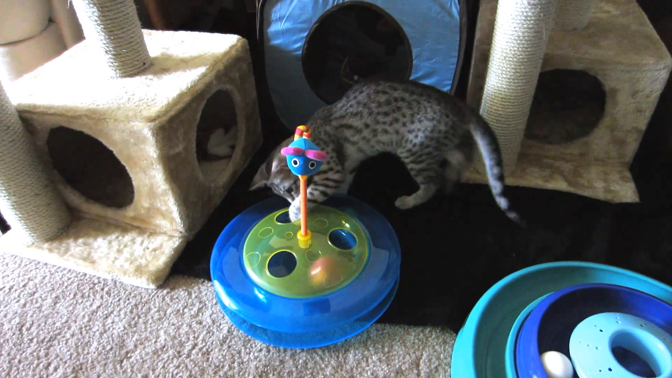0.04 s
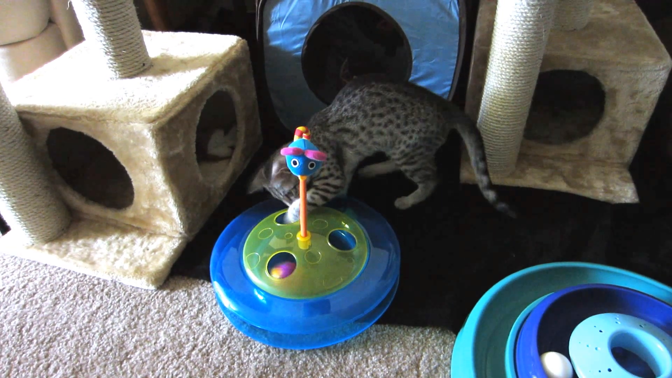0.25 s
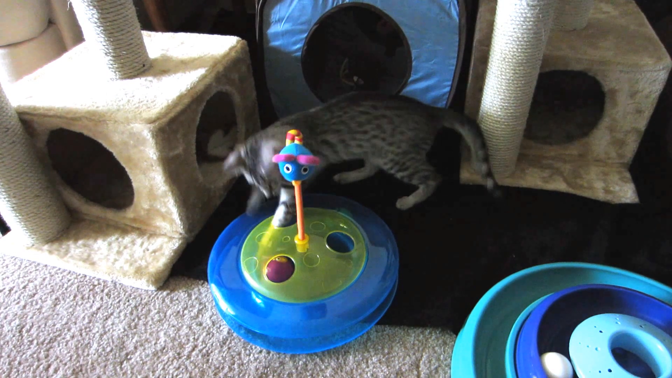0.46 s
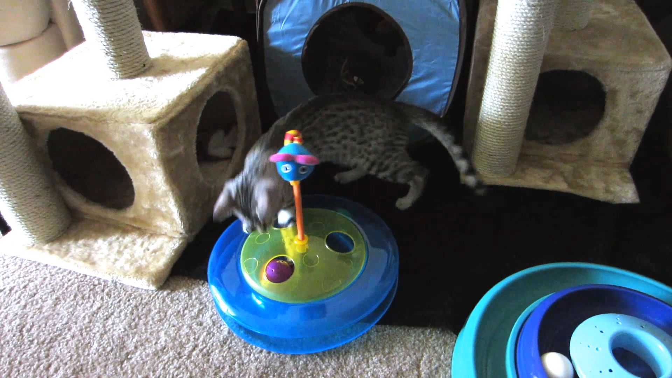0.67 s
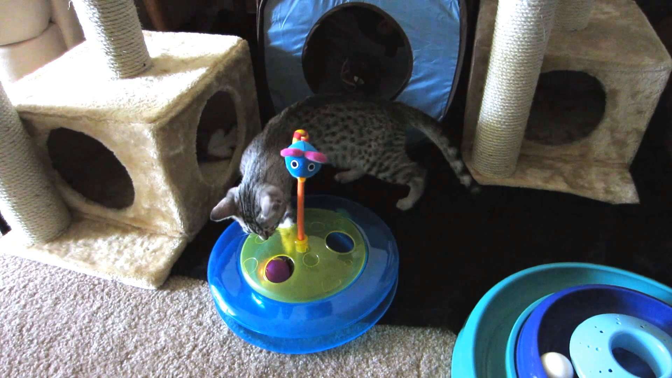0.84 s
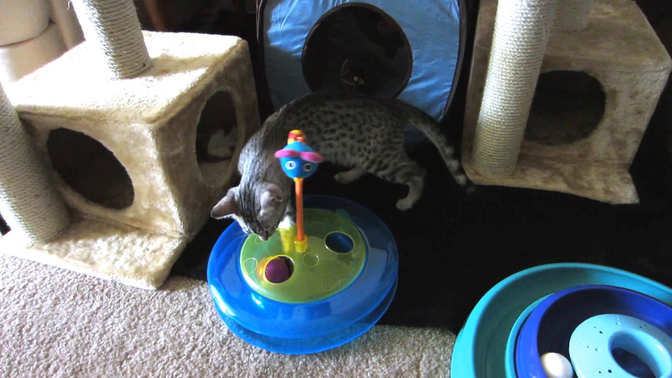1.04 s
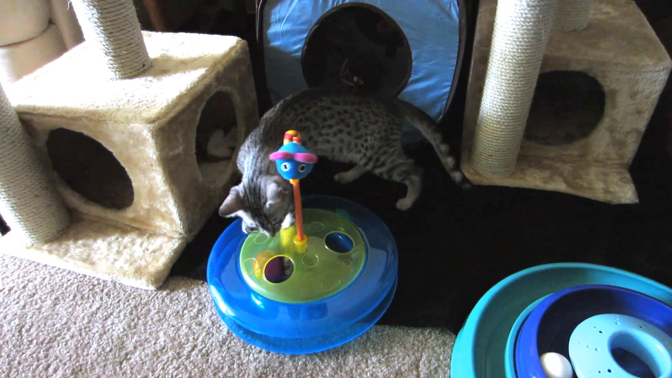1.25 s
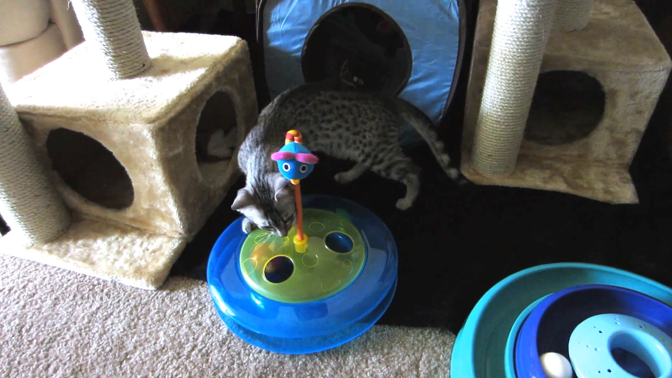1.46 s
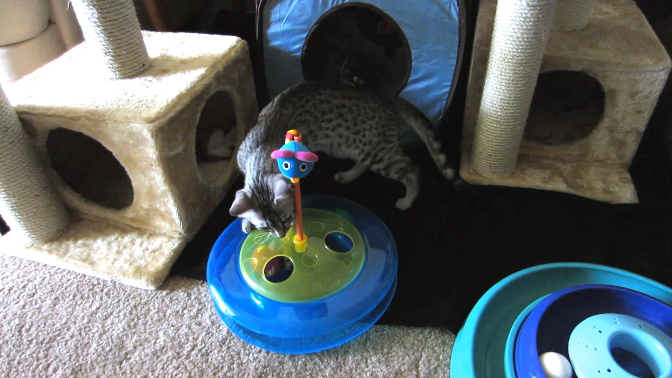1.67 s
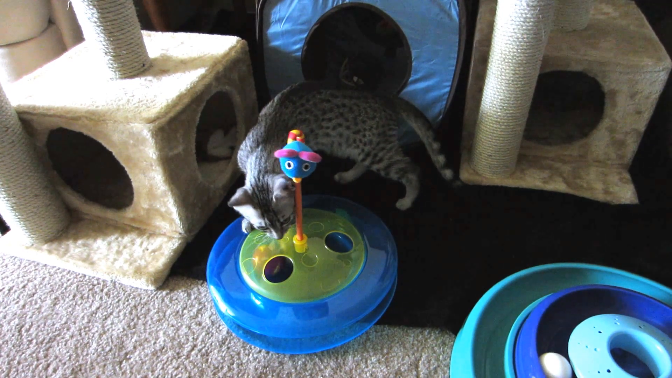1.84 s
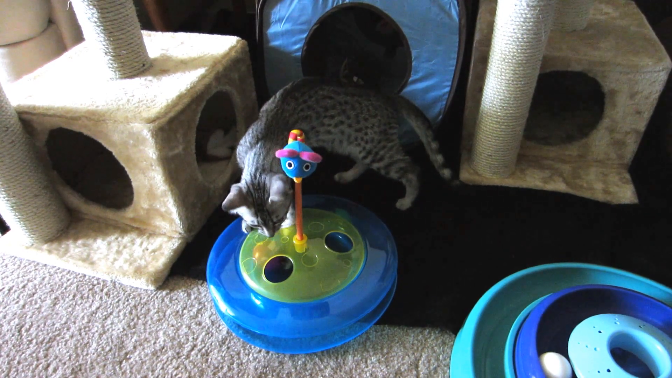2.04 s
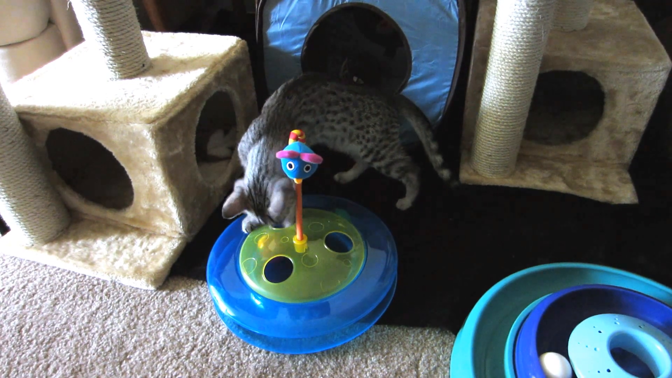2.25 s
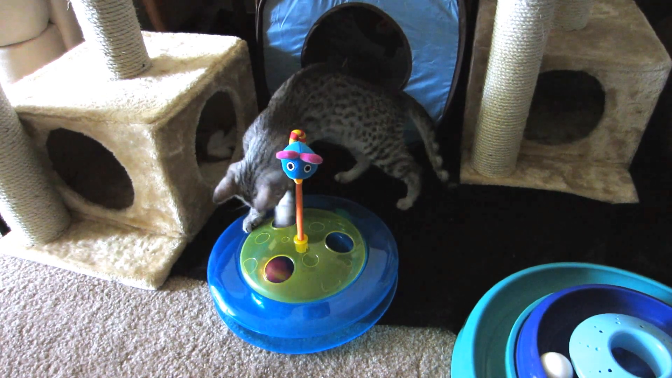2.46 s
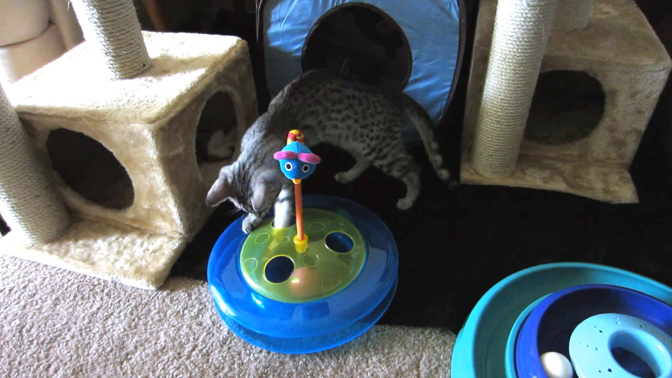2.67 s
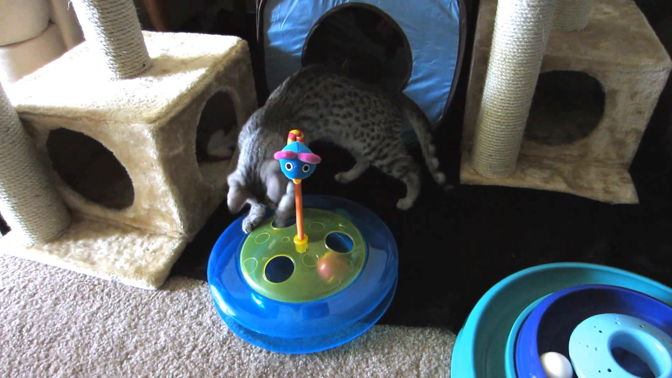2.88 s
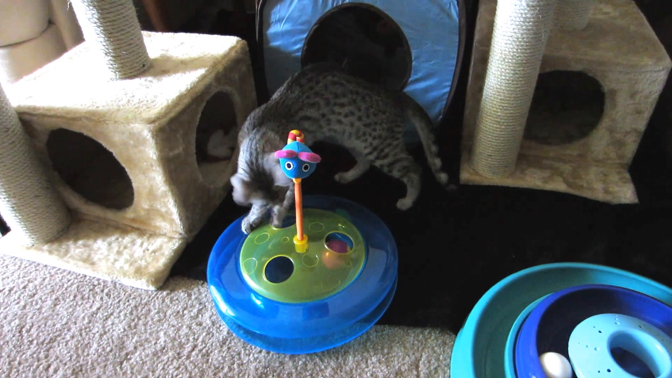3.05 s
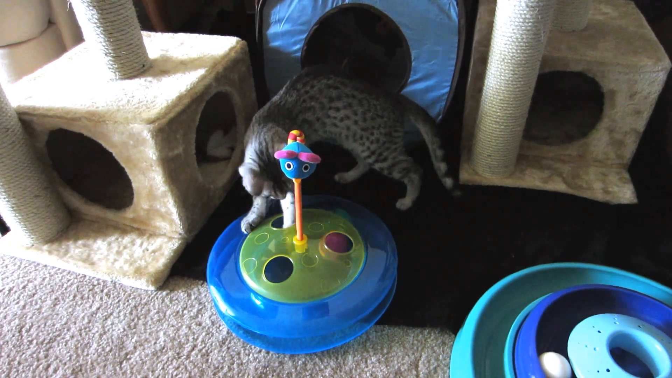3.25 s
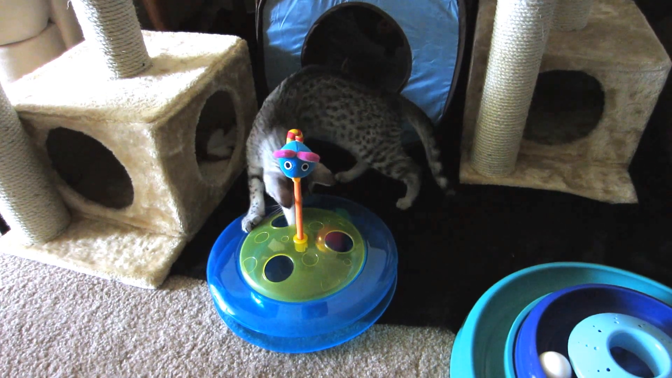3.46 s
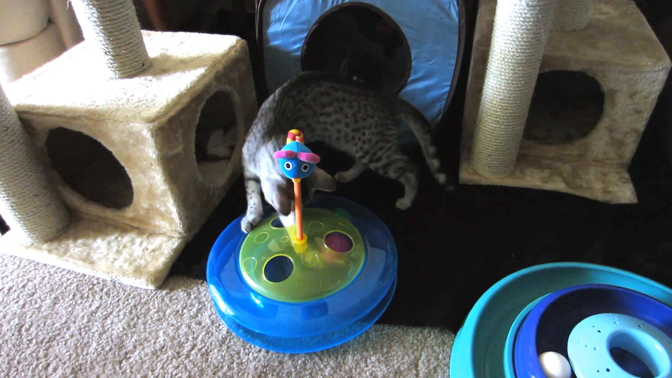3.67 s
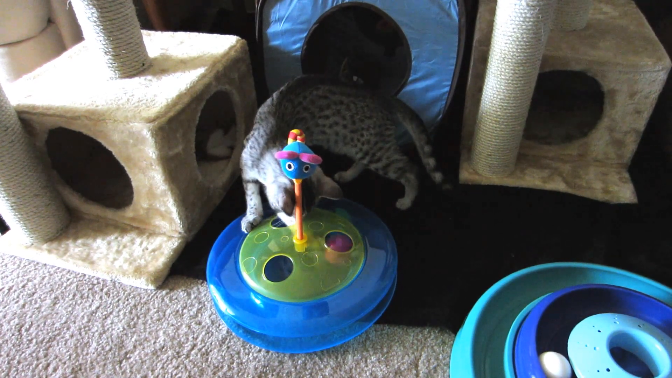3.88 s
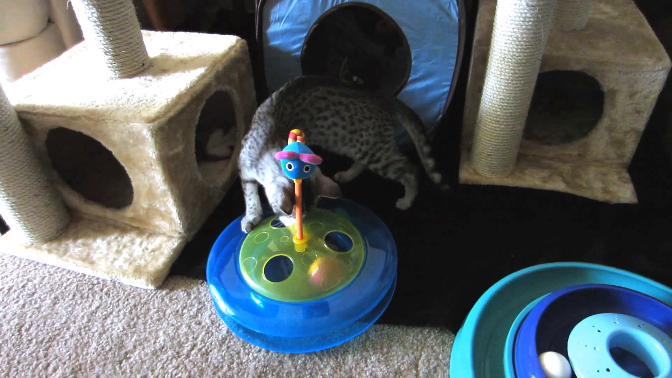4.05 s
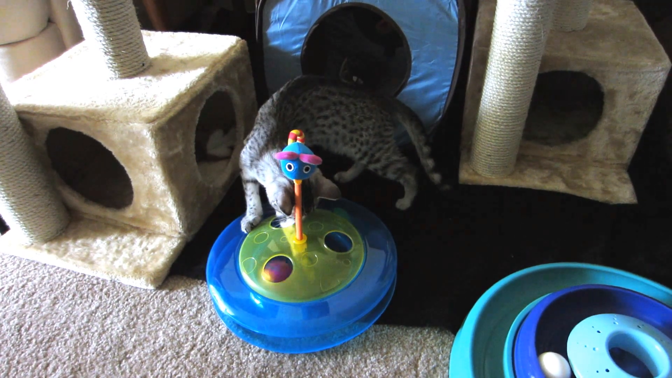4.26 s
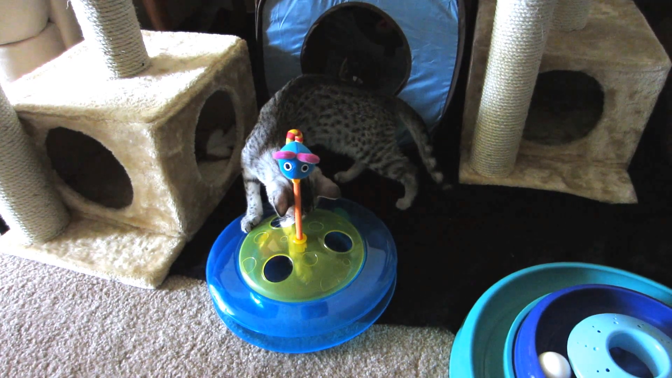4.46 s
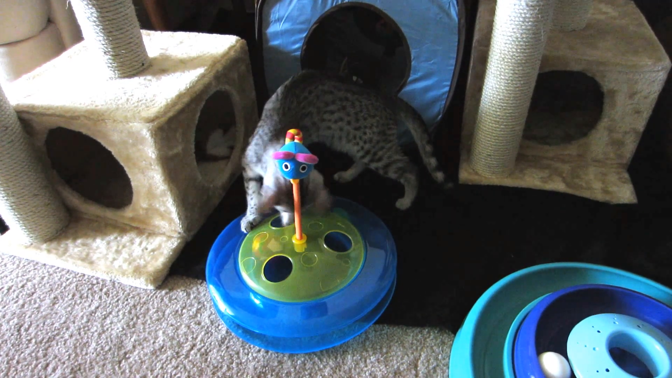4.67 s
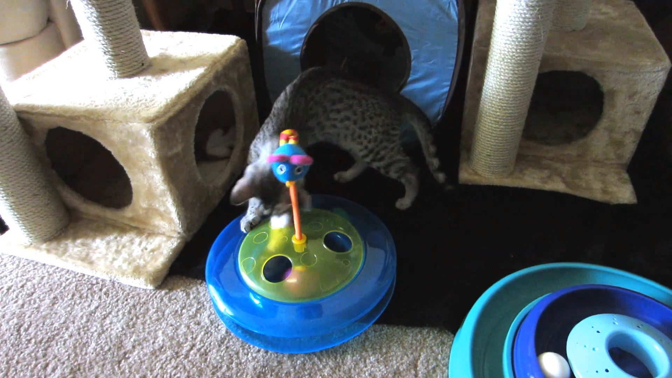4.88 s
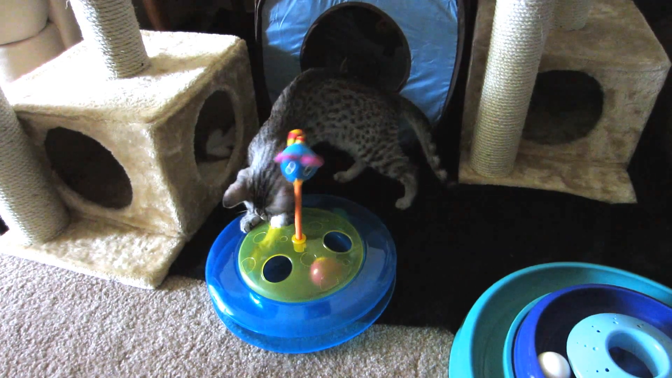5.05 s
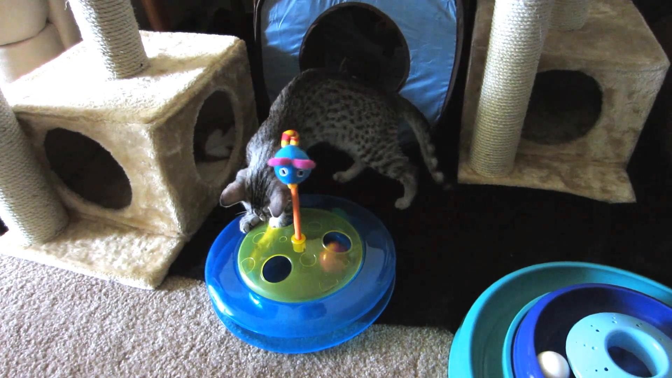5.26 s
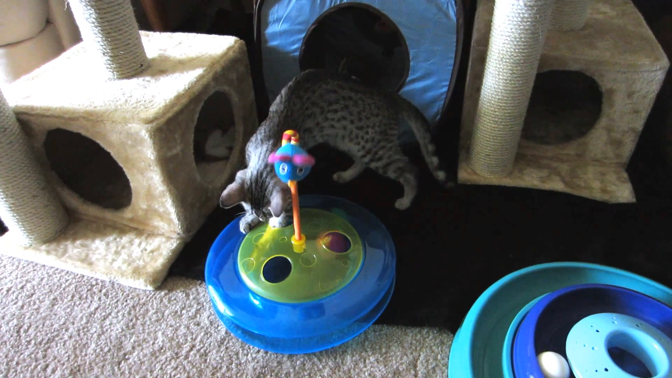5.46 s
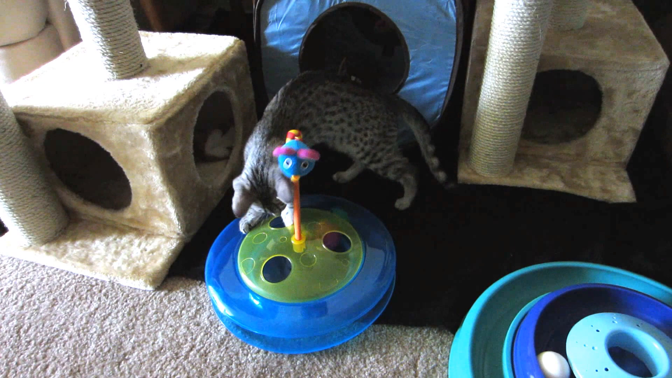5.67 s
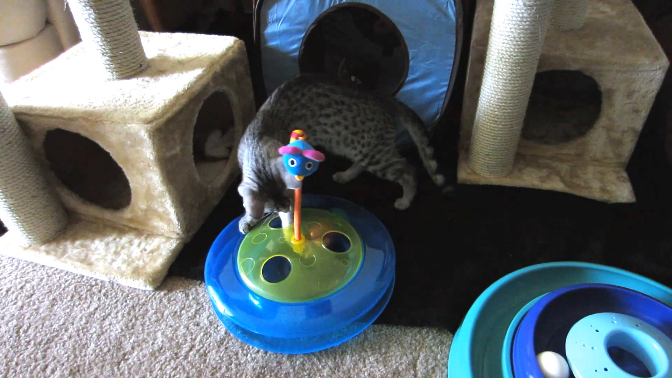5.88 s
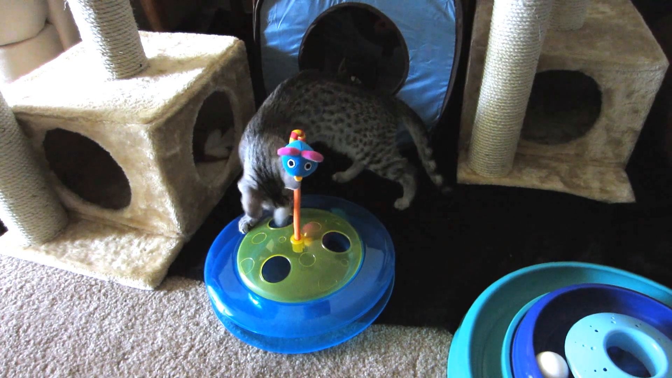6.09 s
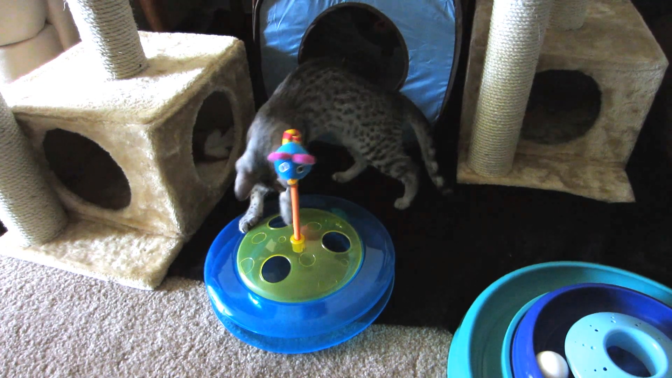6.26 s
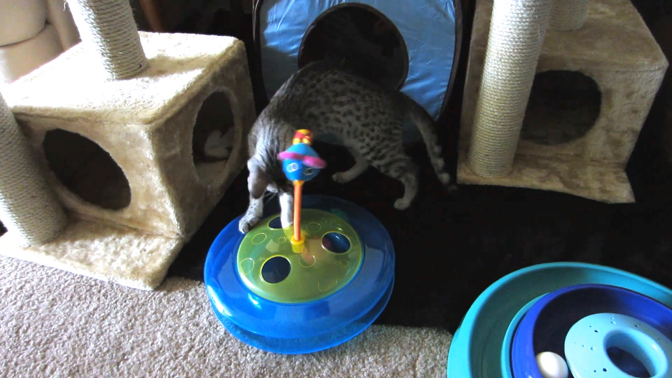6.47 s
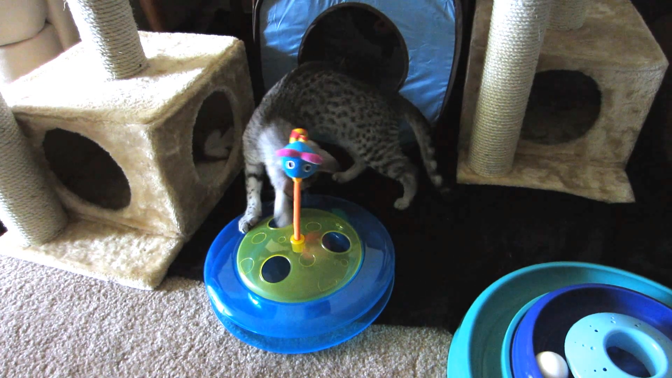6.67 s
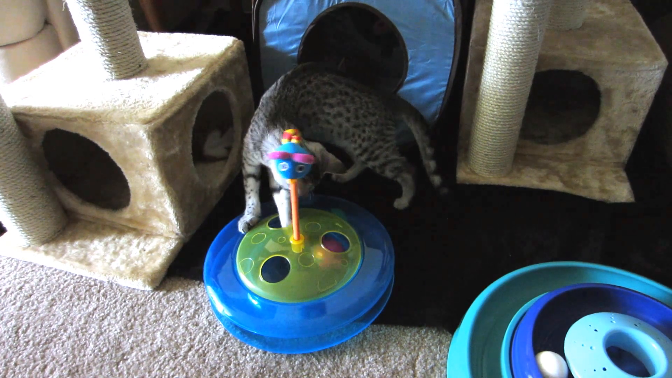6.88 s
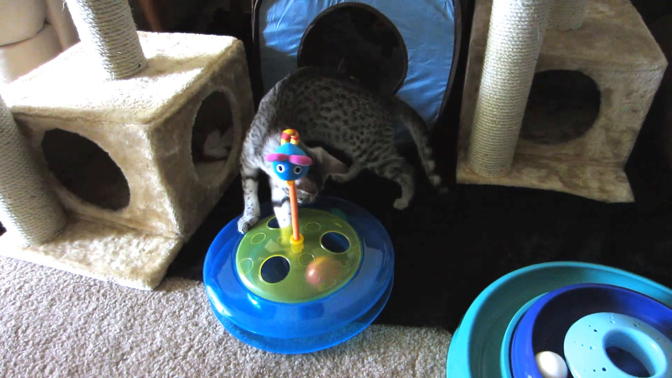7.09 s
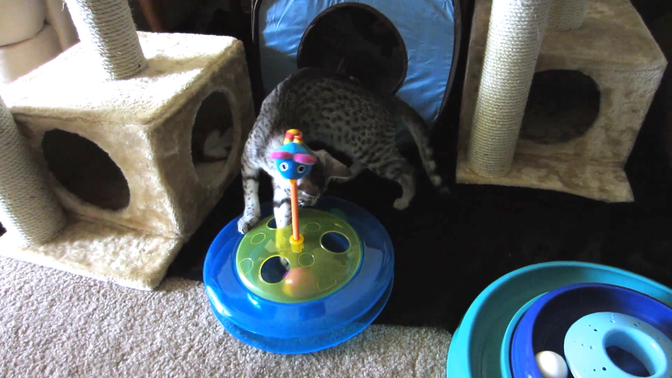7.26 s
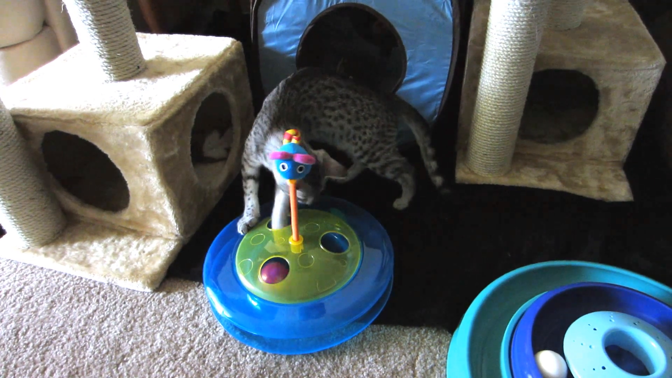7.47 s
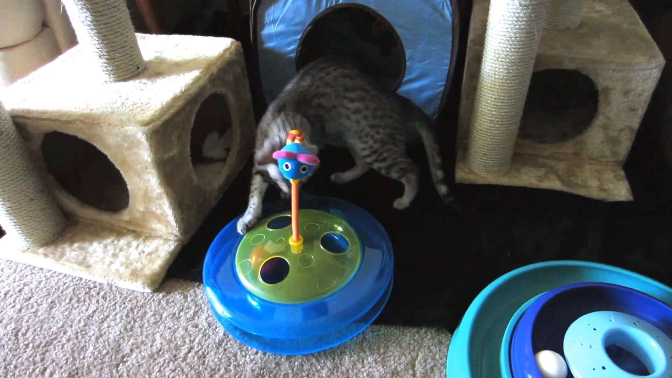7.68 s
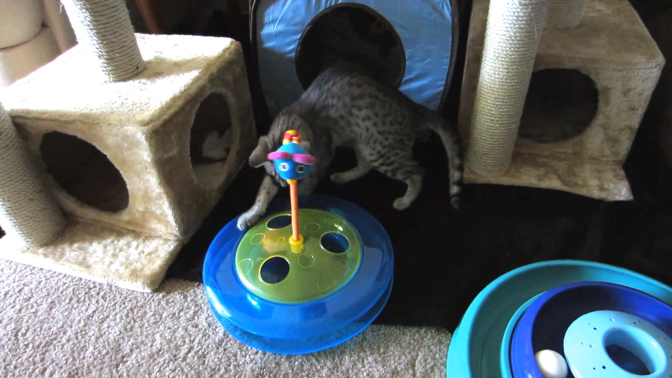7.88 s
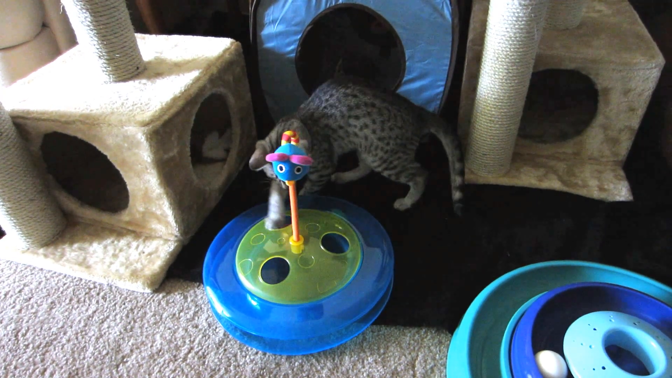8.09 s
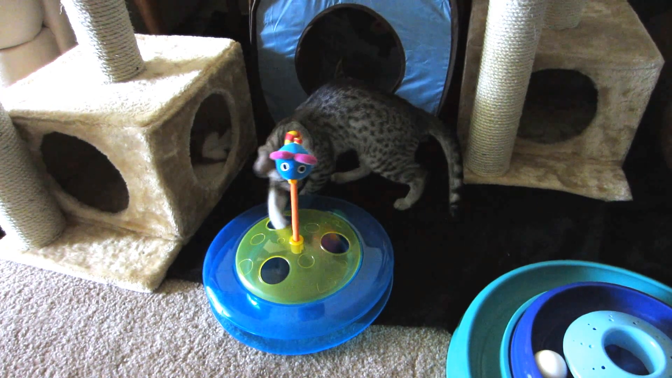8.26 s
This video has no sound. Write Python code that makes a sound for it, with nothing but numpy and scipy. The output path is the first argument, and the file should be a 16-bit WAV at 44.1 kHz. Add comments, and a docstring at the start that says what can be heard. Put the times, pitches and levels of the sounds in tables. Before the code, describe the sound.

Close to the microphone, a cat bats balls inside a hollow plastic track toy. A quick cluster of clattering knocks and rolling opens it, then isolated hard clacks with pauses, another rattling flurry, a lull, a dense busy stretch in the middle, and sparser bursts up to the end. Small dry carpeted room, low air noise and a faint thin whine.

```python
"""Quiet carpeted room: a cat bats the balls of a round plastic track toy close to the microphone.
Knocks and rolling balls excite decaying modes of hollow base, domed lid, thin track walls and ball.
Shaped noise adds cracks to the blows and thin bright ticks, likely claws on plastic.
Sparse reflections surround the toy; filtered noise and wandering sines make room air and a faint whine.
Widened stereo: the left channel is a phase-shifted, level-shifted version of the right."""
import sys
import numpy as np
from scipy import signal
from scipy.fft import rfft, irfft, next_fast_len
from scipy.io import wavfile
from scipy.ndimage import uniform_filter1d

SR = 44100
rng = np.random.default_rng(int(sys.argv[2]) if len(sys.argv) > 2 else 0)


def bounce(signal):
    """Save signal as a 16-bit WAV file at the path given by the first command-line argument."""
    frames = np.transpose(np.atleast_2d(signal))
    limited = np.clip(frames, -1, 1)
    pcm = np.round(limited * 32767).astype(np.int16)
    wavfile.write(sys.argv[1], SR, pcm)


N = 367353

# room air noise, spectral shape in the right channel: (frequency [Hz], relative density [dB])
AIR_SPECTRUM = [(20, -24), (40, -15), (90, 1), (200, 2), (500, -1), (1000, -3.5), (1400, -6.5), (1680, -13),
                (1950, -10.5), (2300, -18), (3000, -25), (3700, -25.5), (4200, -29.5), (6500, -33),
                (9500, -41.5), (16000, -45)]
# faint whine: (frequency [Hz], left level [dB rms], right level [dB rms], left lead [rad], wander [Hz rms])
WHINE_TONES = [(1895, -54.5, -61, -2.5, .4), (6132, -81, -82, -1.7, 1.)]
# left channel re right, room air: (frequency [Hz], level [dB], phase lead [rad], likeness [0-1])
AIR_STEREO = [(60, 2, -1.15, .7), (200, -.8, -1.35, .77), (360, -2.4, -1.9, .8), (600, -.8, -2.4, .83),
              (1250, 2.3, -2.86, .86), (2000, 3.5, -2.8, .75), (4000, 2.3, -2.5, .5), (5500, .2, -2.5, .12),
              (9000, -1, -2.5, .05)]
# left channel re right, toy; likeness for reflections: (frequency [Hz], level [dB], lead [rad], likeness [0-1])
TOY_STEREO = [(100, 0, -1., .95), (200, -1.5, -1.1, .95), (420, -2.2, -1.57, .9), (800, -3.4, -2.2, .85),
              (1500, -3.4, -3.1, .85), (2250, -6.8, -3.45, .8), (4000, -8, -3.95, .6),
              (6000, -11, -4.35, .35), (11000, -14, -4.8, .2), (16000, -7, -5.2, .1)]
# reverberation: (frequency [Hz], t60 [s])
ROOM_DECAY = [(200, 0.47), (1000, 0.22), (4000, 0.35), (12000, 0.46)]
# balls pushed into rolling: (time of full speed [s], rumble level [dB])
ROLLS = [(0.02, -35.5), (.53, -35), (1.5, -56.5), (1.92, -43.5), (2.57, -34.5), (4.11, -42.5), (4.4, -37),
         (4.85, -35), (5.4, -50.5), (6.56, -58), (7.12, -43.5), (7.45, -49), (7.79, -50.5), (8.31, -32)]
# knocks of ball or paw: (time [s], lid force [dB], base re lid [dB], crack re lid [dB])
KNOCKS = [(.0004, -24, -4.5, -24), (.055, -23, -18, -31), (.0856, -22.5, -4, -27), (.1074, -16.5, -20, -29),
          (.118, -38.5, 14, -9), (.1465, -25, -2, -32.5), (.207, -35.5, 1.5, -25), (.3491, -20.5, -6, -26),
          (.3631, -21, -11, -32.5), (.4209, -35, -2, -9.5), (.4552, -19.5, -14, -25.5),
          (.5024, -18, 2.5, -15), (.561, -20.5, -5, -46), (.6266, -7, -8, -18.5), (.6394, -10, -19.5, -22),
          (.688, -37, -22, -35), (1.157, -9.5, -2.5, -18), (1.1828, -9, -22, -21),
          (1.5607, -11.5, -2.5, -20), (1.5872, -19, -6.5, -20), (1.6457, -4.5, -35, -23.5),
          (1.8802, -21, -3, -23), (2.0637, -25.5, -15, -55), (2.1906, -29.5, -2, -23),
          (2.392, -23, -8.5, -53), (2.4518, -11.5, -19, -27.5), (2.5067, -13, 0, -18.5),
          (2.532, -17, -0.5, -19), (2.5933, -22.5, -5, -32), (2.6113, -25.5, 2.5, -20),
          (2.6476, -42, -14, -23), (2.6632, -21.5, -4, -26.5), (2.6916, -30, -7, -24),
          (2.7399, -31, 2, -25), (2.7668, -26, -1.5, -31), (2.8046, -27.5, -0.5, -25),
          (2.843, -26.5, -4, -29), (2.9479, -34, 6.5, -26), (3.0517, -32.5, -1, -25),
          (3.1582, -30, -15, -28.5), (3.5025, -33.5, 0.5, -14), (3.6828, -31, -3.5, -25.5),
          (3.7556, -28, -11, -38), (3.7739, -32, 0.5, -29), (3.9203, -9, -10, -19),
          (4.0081, -13, -1.5, -24), (4.1375, -15, -12, -31), (4.1554, -32, 12.5, -9.5),
          (4.1785, -18.5, -22, -26.5), (4.1957, -35, 11, -15), (4.2842, -28, -2, -29),
          (4.3021, -18, -8, -29), (4.3277, -16.5, -3, -19.5), (4.3544, -19.5, -2, -23),
          (4.3714, -23.5, -3, -17.5), (4.451, -33, -27, -38), (4.4826, -28.5, -0.5, -30),
          (4.552, -23.5, -5, -36), (4.5615, -21.5, -1, -30.5), (4.6355, -28, -6, -27),
          (4.6513, -20.5, 1, -24), (4.674, -11, -21, -22.5), (4.7741, -23, -18, -27),
          (4.8407, -14, -1.5, -16.5), (4.8813, -19, -11, -24.5), (4.8935, -22, -1.5, -21),
          (4.9493, -12, -27, -25.5), (4.9726, -20.5, 2, -24), (5.0067, -21.5, -7, -34),
          (5.0846, -29, -7.5, -29), (5.1322, -27.5, -3.5, -31), (5.2059, -32.5, 3.5, -23),
          (5.5087, -33, -2.5, -25), (5.6167, -18.5, -5, -40), (5.674, -23, -15, -29),
          (5.815, -18, 2.5, -18), (5.8273, -26.5, -23, -14.5), (6.1946, -46.5, -10, -9),
          (6.3999, -15, -12.5, -58), (6.4294, -20, -5.5, -55), (6.6296, -18.5, -8, -59),
          (6.7547, -34, -7, -18), (6.9793, -19.5, -7.5, -23), (7.0138, -14.5, -1, -17.5),
          (7.0491, -29, -1, -30), (7.1051, -24.5, -2.5, -31), (7.1164, -28.5, 2, -19),
          (7.2219, -17, -17, -32.5), (7.2328, -47, 19, -24), (7.2609, -30, 0, -33), (7.303, -33, 1, -29),
          (7.3757, -28.5, -3, -24), (7.615, -36.5, 4.5, -24), (7.711, -30.5, 0.5, -24),
          (7.7882, -20, -22, -29), (7.8025, -23.5, 0, -20), (7.8392, -29, -3, -30), (7.8563, -33, 0, -27),
          (7.8916, -25, -3.5, -31), (8.1776, -39.5, -9, -15), (8.2257, -11, -14, -20),
          (8.2448, -24.5, -6.5, -10.5), (8.287, -19.5, -16, -41)]
# thin bright ticks, likely claws on plastic: (time [s], level before colouring [dB], t60 [s])
CLAW_TICKS = [(0.4094, -65, 0.098), (3.5047, -44.5, 0.049), (3.5594, -57, 0.086), (3.6384, -50, 0.054),
              (4.776, -49.5, 0.12), (4.941, -41.5, 0.047), (6.1953, -63, 0.064), (6.7545, -61, 0.08),
              (6.8314, -42.5, 0.057), (7.891, -58, 0.063), (8.1748, -55, 0.044)]
# noise colour of a crack: (frequency [Hz], gain [dB])
CRACK_COLOUR = [(1500, 0.5), (3000, 20), (6000, 2), (9000, -5.5), (15000, -16)]
# noise colour of a tick: (frequency [Hz], gain [dB])
TICK_COLOUR = [(2000, -11), (4500, 7.5), (6500, 11), (9000, 4.5), (15000, -8)]
# modes of the hollow base: (frequency [Hz], relative level [dB], t60 [s])
BASE_MODES = [(174.3, -12.5, 0.12), (197, -4.5, 0.12), (248.5, -3, 0.053), (303, 0.5, 0.076),
              (346.7, 0.5, 0.045), (422.3, 2.5, 0.062), (488, 1, 0.076)]
# modes of the domed lid: (frequency [Hz], relative level [dB], t60 [s])
LID_MODES = [(508, -0.5, 0.015), (672.5, 0, 0.03), (820, -9, 0.071), (936, 5, 0.025), (1038, 3.5, 0.03),
             (1187, 3.5, 0.014)]
# modes of the thin track walls: (frequency [Hz], relative level [dB], t60 [s])
WALL_MODES = [(1426, 3.5, 0.018), (1498, 7.5, 0.022), (1562, 6.5, 0.0087), (1882, 2, 0.009)]
# modes of the ball shell: (frequency [Hz], relative level [dB], t60 [s])
BALL_MODES = [(2200, 10, 0.02), (2457, -4.5, 0.019), (2877, -10, 0.023), (2956, -11.5, 0.036),
              (3180, -10, 0.015), (3536, -13.5, 0.036), (3825, -13, 0.022), (4280, -12, 0.02),
              (4910, -14, 0.022), (6190, -17.5, 0.018)]
# microphone colour: (frequency [Hz], gain [dB])
MIC_RESPONSE = [(8000, -1.98), (10500, -5.5), (11800, -17.5), (13000, -10.5), (15000, -4)]

AIR_DB_RMS, BAND_EDGE_HZ = -40, 15850
PATTERN_TURN_S = .23  # three reflection patterns rotate slowly, each leading in turn
SPEEDUP_DB_PER_S, SLOWDOWN_DB_PER_S, ROCKING_DB = 123, 57, -57  # at rest the balls still rock faintly
GRIT_PER_S = 500
TAPS_PER_S, TAP_RE_RUMBLE_DB, TAP_SPREAD_DB, TAP_CRACK_RE_LID_DB = 12, 4, 6, -36
WALLS_RE_LID_DB, WALLS_DB_PER_CRACK_DB, WALLS_DB_PER_BASE_DB = 1.5, 0.2, 0.15
REFLECTIONS_DB = -7.5
GAIN_THRESHOLD_DB, GAIN_CUT_DB_PER_DB, GAIN_RECOVERY_DB_PER_S = -20, 0.32, 22.0  # recovery of the held level


def gain_of(db):
    """Decibels to amplitude."""
    return 10 ** (np.asarray(db) / 20)


def evened(x):
    """Scale to rms 1."""
    return x / np.sqrt(np.mean(x ** 2) + 1e-20)


def columns_at(table, hz):
    """Interpolate each column of a frequency table on a log axis."""
    table_hz, *columns = np.transpose(table)
    return [np.interp(np.log(hz + 1), np.log(table_hz + 1), column) for column in columns]


def coloured(x, table):
    """Filter, zero phase, by a gain table in dB."""
    hz = np.fft.rfftfreq(x.shape[-1], 1 / SR)
    return irfft(rfft(x) * gain_of(columns_at(table, hz)[0]), x.shape[-1])


def widened(shared, other, table):
    """Stereo widener: right is shared; left is it shifted in phase and level, blended with other if given."""
    size = next_fast_len(N)
    level_db, lead_rad, likeness = columns_at(table, np.fft.rfftfreq(size, 1 / SR))
    left = np.exp(1j * lead_rad) * rfft(shared, size)
    if other is not None:
        left = likeness * left + np.sqrt(1 - likeness ** 2) * rfft(other, size)
    return np.array([irfft(gain_of(level_db) * left, size)[:N], shared])


def whine():
    """Thin sines whose pitch and level wander a little."""
    out = np.zeros((2, N))
    for hz, left_db, right_db, lead_rad, wander_hz in WHINE_TONES:
        drift, flutter = (evened(uniform_filter1d(row, 3000)) for row in rng.standard_normal((2, N)))
        phase_rad = 2 * np.pi * np.cumsum(hz + wander_hz * drift) / SR
        amplitude = np.sqrt(2) * gain_of(np.c_[[left_db, right_db]] + 2 * flutter)
        out += amplitude * np.sin(phase_rad + np.c_[[lead_rad, 0]])
    return out


def air():
    """Room noise: random spectra with faint drifting patches, partly alike in both channels, plus whine."""
    frames, hz = N // 256 + 5, np.fft.rfftfreq(1024, 1 / SR)
    a, b, c, d, patches = rng.standard_normal((frames, 513, 5)).T
    patches = uniform_filter1d(patches, 10, 0)
    patches = evened(uniform_filter1d(patches, 12, 1))
    spectrum_db = columns_at(AIR_SPECTRUM, hz)[0][:, None] + 1.22 * patches
    spectra = np.array([a + 1j * b, c + 1j * d]) * gain_of(spectrum_db)
    noise = signal.istft(spectra, nperseg=1024, noverlap=768)[1][:, :N]
    return widened(*(gain_of(AIR_DB_RMS) * evened(noise)), AIR_STEREO) + whine()


def room(x):
    """Sparse random-sign reflections, each band dying at its own speed; three patterns take turns."""
    taps = np.zeros((3, 2, SR // 2))
    slots = np.arange(140, SR // 2 - 20, 20)  # first reflection after about 3 ms
    at = slots + rng.integers(0, 20, (3, 2, (SR // 2 - 141) // 20))
    np.put_along_axis(taps, at, rng.choice([-1., 1.], at.shape), 2)
    hz, t, spectra = signal.stft(taps, SR, nperseg=256)
    decay_db = -60 * t / columns_at(ROOM_DECAY, hz)[0][:, None]
    tail = signal.istft(spectra * gain_of(decay_db), SR, nperseg=256)[1]
    tail /= np.linalg.norm(tail[0, 0])
    turn_rad = np.pi * (np.arange(N) / SR / PATTERN_TURN_S + np.c_[[0, 1, 2]]) / 3
    turn = np.sqrt(2 / 3) * np.cos(turn_rad)  # squares sum to 1
    return signal.fftconvolve((turn * x)[:, None], tail, axes=2)[..., :N].sum(0)


def bursts(start_s, level_db, t60_s, colour):
    """Coloured noise bursts with a sudden start and a dying tail."""
    out, t = np.zeros(N + 4000), np.arange(4000) / SR
    noise = rng.standard_normal((len(start_s), 4000))
    for s, db, decay_s, row in zip(start_s, level_db, t60_s, noise):
        envelope = gain_of(db - 60 * t / max(decay_s, .003))
        out[round(s * SR):][:4000] += envelope * row
    return coloured(out, colour)[:N]


def rumble_db(s):
    """Rumble level: each roll swells quickly and dies away; roll powers add."""
    top_s, top_db = np.transpose(ROLLS)[:, :, None]
    drop_db = np.maximum(SPEEDUP_DB_PER_S * (top_s - s), SLOWDOWN_DB_PER_S * (s - top_s))
    power = gain_of(2 * ROCKING_DB) + gain_of(2 * (top_db - drop_db)).sum(0)
    return 10 * np.log10(power)


def rolling():
    """Drive of a rolling ball meeting seams and grit: many tiny uneven blows."""
    height = gain_of(4.5 * np.minimum(rng.exponential(1, N), 4))
    grit = height * (rng.random(N) < GRIT_PER_S / SR) * rng.choice([-1, 1], N)
    s = np.arange(0, N, 200) / SR
    return gain_of(np.interp(np.arange(N) / SR, s, rumble_db(s))) * evened(grit)


def knocks():
    """The clear knocks, then light taps of rolling balls at chance moments, following the rumble."""
    gap, force, base = rng.random((200, 3)).T
    s = np.cumsum(-np.log(1 - gap)) / TAPS_PER_S
    force_db = rumble_db(s) + TAP_RE_RUMBLE_DB + TAP_SPREAD_DB * (2 * force - 1)
    taps = np.c_[s, force_db, 12 * (base - .6), TAP_CRACK_RE_LID_DB + 0 * s]
    taps[s > N / SR - .05, :2] = 0, -120  # taps past the end: inaudible
    return np.r_[KNOCKS, taps].T


def blows(start_s):
    """One blow and four weaker rebounds of loose plastic per knock: (time [s], level [dB]) arrays."""
    late = rng.random((len(start_s), 5)) * (np.arange(5) > 0)
    rebound = late > 0
    return start_s[:, None] + rebound * .004 + .03 * late, rebound * -7. - 16 * late


def ring(pulses, hz, t60_s):
    """Two-pole resonance: each pulse starts a sine of its own height that dies away."""
    r = 10 ** (-3 / (max(t60_s, .004) * SR))
    w = 2 * np.pi * hz / SR
    return signal.lfilter([0, r * np.sin(w)], [1, -2 * r * np.cos(w), r ** 2], pulses)


def swell(x, hz):
    """Second, wider pass through the resonance: the ring takes a moment to build up."""
    return ring(x, hz, .004) * 2 * np.log(1000) / (.004 * SR)


def toy():
    """Blows and rolling excite the same modes; each blow lands elsewhere, so mode heights and signs vary."""
    start_s, lid_db, base_re_lid_db, crack_re_lid_db = knocks()
    base_db, crack_db = lid_db + base_re_lid_db, lid_db + crack_re_lid_db
    walls_db = lid_db + WALLS_RE_LID_DB
    walls_db = walls_db + WALLS_DB_PER_CRACK_DB * crack_re_lid_db + WALLS_DB_PER_BASE_DB * base_re_lid_db
    ball_db = (walls_db + crack_db) / 2 - 1.0  # ball shell rings at every blow, louder with a stronger crack
    blow_s, rebound_db = blows(start_s)
    at = np.minimum(np.round(blow_s * SR).astype(int), N - 1)
    roll, out = rolling(), np.zeros(N)
    # (modes, knock level [dB], rolling gain [dB], contact time [s])
    parts = [(BASE_MODES, base_db, -22, .0011), (LID_MODES, lid_db, -24, .0004),
             (WALL_MODES, walls_db, -25, .0003), (BALL_MODES, ball_db, -31, .00012)]
    for modes, knock_db, roll_db, contact_s in parts:
        part = np.zeros(N)
        for hz, mode_db, t60_s in modes:
            place = rng.choice([-1, 1], at.shape) * gain_of(2.53 * rng.standard_normal(at.shape))
            pulses = gain_of(roll_db) * roll * rng.choice([-1, 1], N)
            np.add.at(pulses, at, place * gain_of(knock_db[:, None] + rebound_db))
            part += gain_of(mode_db) * swell(ring(pulses, hz, t60_s), hz)
        contact = np.clip(np.arange(.5, 200) / (contact_s * SR), 0, 1)
        push = np.sin(np.pi * contact) ** 2  # a blow lasts a moment
        out += np.convolve(part, push / push.sum())[:N]
    # too small to radiate deep bass
    out = signal.sosfilt(signal.butter(4, 175, "high", fs=SR, output="sos"), out)
    return out + bursts(blow_s[:, 0], crack_db + 1, 0.034 + 0 * crack_db, CRACK_COLOUR)


def scene():
    """Room air, reflections, and the toy with its ticks."""
    near = toy() + bursts(*np.transpose(CLAW_TICKS), TICK_COLOUR)
    reflections = gain_of(REFLECTIONS_DB) * room(near)
    return air() + widened(*reflections, TOY_STEREO) + widened(near, None, TOY_STEREO)


def record(dry):
    """Microphone colour, mild gain control with slow recovery, clipping, band limit."""
    padded = np.pad(dry, [(0, 0), (0, next_fast_len(N) - N)])
    x = coloured(padded, MIC_RESPONSE)[:, :N]
    power_db = 10 * np.log10(abs(uniform_filter1d((x ** 2).mean(0), 400)) + 1e-12)
    fall_db = np.arange(N) * GAIN_RECOVERY_DB_PER_S / SR
    held_db = np.maximum.accumulate(power_db + fall_db) - fall_db
    over_db = np.maximum(held_db - GAIN_THRESHOLD_DB, 0)
    cut_db = GAIN_CUT_DB_PER_DB * uniform_filter1d(over_db, 600, origin=299)  # lags the level
    x = np.clip(x / gain_of(cut_db), -1, 1)
    lowpass = signal.firwin(511, BAND_EDGE_HZ, window=("kaiser", 9), fs=SR)
    return signal.oaconvolve(x, lowpass[None], "same")


dry = scene()
out = record(dry)
bounce(out)
```